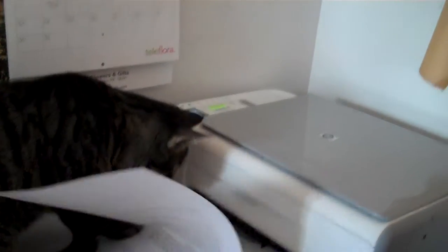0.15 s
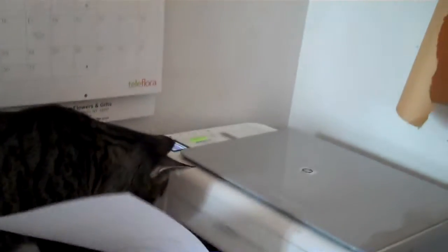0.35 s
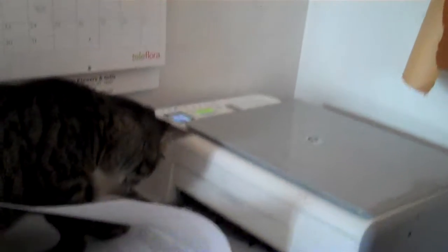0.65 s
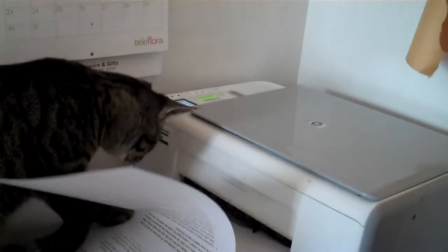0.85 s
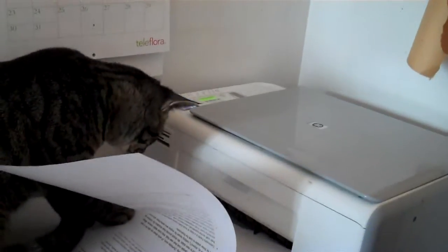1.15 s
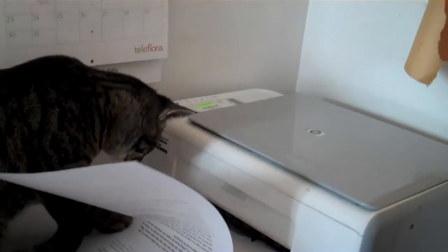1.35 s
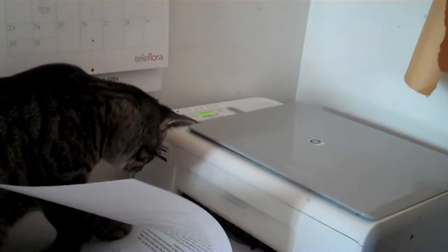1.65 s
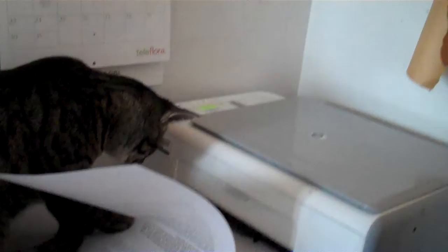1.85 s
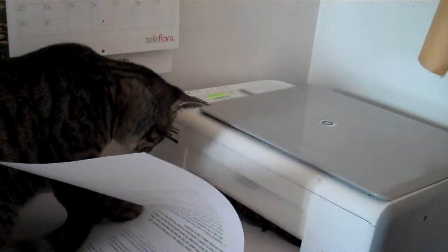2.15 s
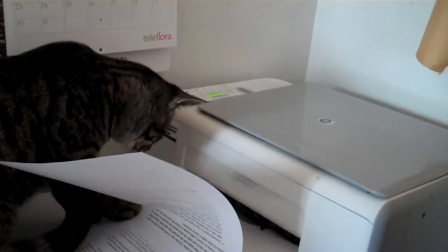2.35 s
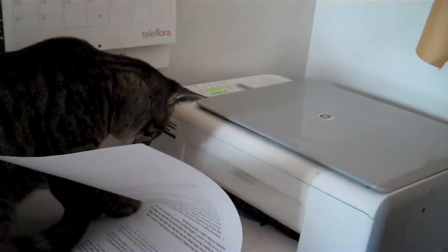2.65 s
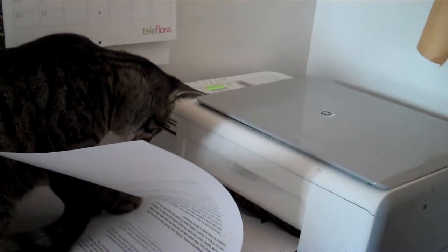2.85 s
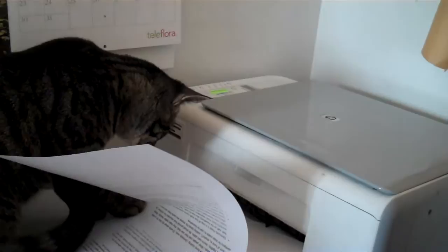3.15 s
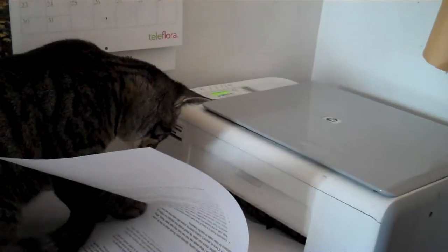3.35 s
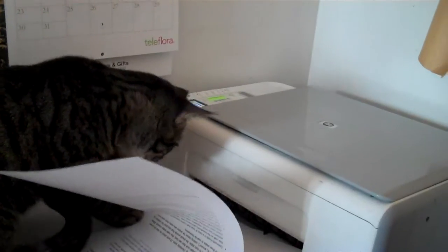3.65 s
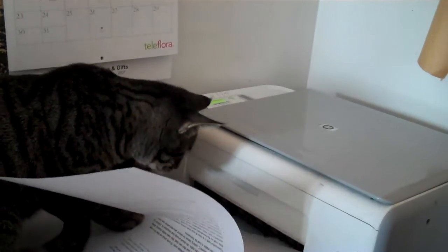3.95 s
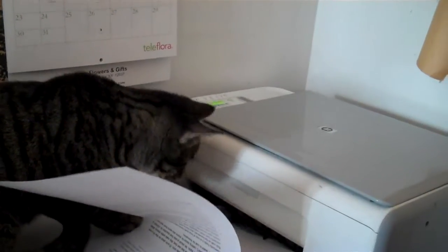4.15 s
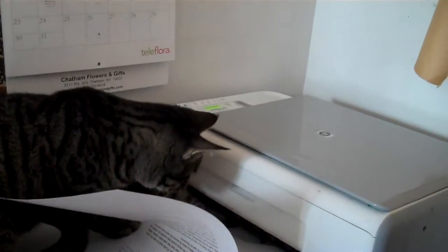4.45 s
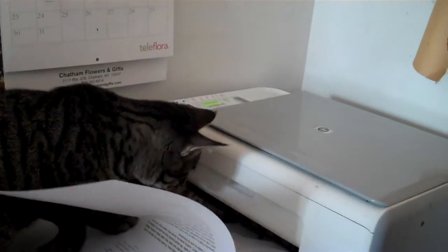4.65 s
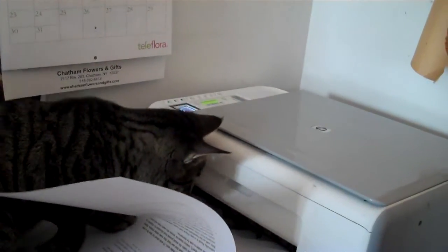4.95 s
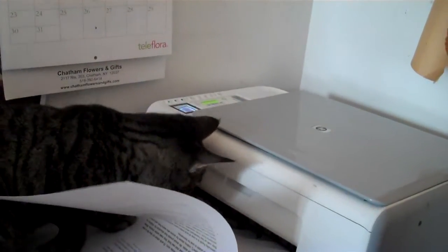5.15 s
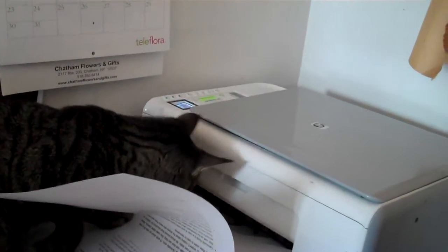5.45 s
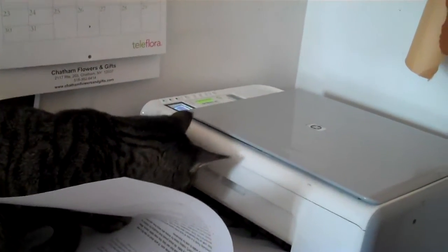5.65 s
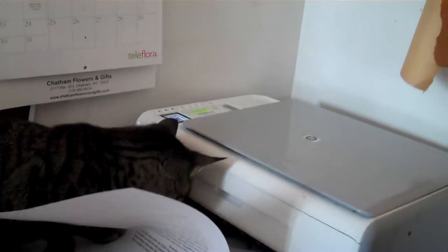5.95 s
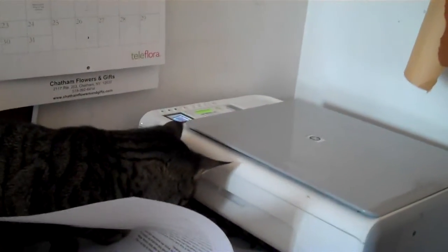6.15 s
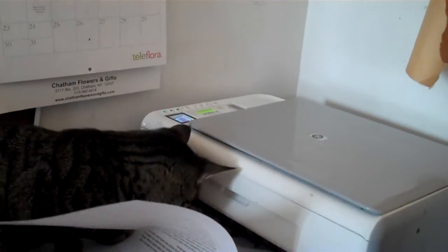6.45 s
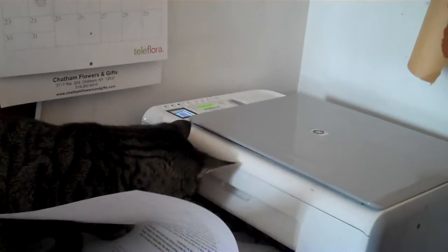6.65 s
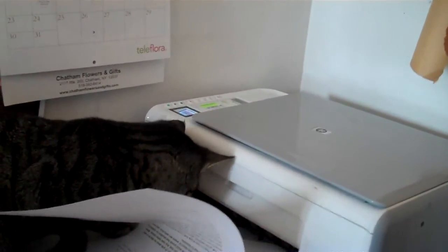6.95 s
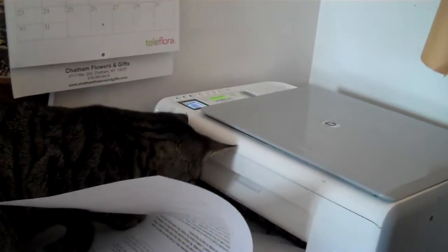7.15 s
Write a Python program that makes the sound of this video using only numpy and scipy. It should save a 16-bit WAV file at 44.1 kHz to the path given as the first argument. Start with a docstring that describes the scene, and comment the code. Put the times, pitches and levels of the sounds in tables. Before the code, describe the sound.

An inkjet printer clunks, rattles and whines as it feeds a sheet, then a cat paws paper with rustles and sharp taps.

```python
"""An inkjet printer parks its head, clunks through its gears and feeds a sheet, then stops.
Latches ring its plastic case, gear teeth rattle, two motors whine and jolts boom in the desk.
A cat noses and paws at the paper in the tray: sheets slide with a catching hiss, snap and tap.
A faint fan runs on. The room corner adds a short tail, and a small camera close by brightens
the treble with its two resonant microphone ports."""
import sys
import numpy as np
from scipy import signal
from scipy.fft import rfft, irfft
from scipy.io import wavfile

SR = 44100
rng = np.random.default_rng(int(sys.argv[2]) if len(sys.argv) > 2 else 0)


def to_wav(sig):
    """Store sig (one row per channel, or 1-D mono) as 16-bit WAV at the path in sys.argv[1].

    Samples outside -1..1 are clipped; the rate is SR.
    """
    pcm = np.clip(np.atleast_2d(sig), -1, 1) * 32767
    pcm = np.round(pcm).astype(np.int16)
    wavfile.write(sys.argv[1], SR, pcm.T)  # frames by channels


N = 321921
TIME, HZ = np.arange(N) / SR, np.fft.rfftfreq(N, 1 / SR)

# Hits of latches, gears and carriage stops, levels before trim:
# (time [s], length [s], thud [dB], clack [dB], tick [dB], ring of the struck part [Hz])
KNOCK_HITS = [(0.317, 0.0025, -60, -39.5, -36, 5530), (0.338, 0.014, -60, -32, -31, 370),
              (0.351, 0.013, -32.5, -41, -34.5, 342), (0.418, .011, -25.5, -27, -16.5, 238),
              (0.484, 0.0064, -46, -50, -30.5, 354), (0.885, 0.016, -41.5, -42.5, -63, 2880),
              (0.93, 0.03, -47, -46, -54, 524), (0.962, 0.028, -36.5, -41.5, -36.5, 3280),
              (0.977, 0.0086, -32, -26.5, -33, 3200), (1.024, 0.015, -36.5, -31, -28, 3800),
              (1.042, 0.02, -39.5, -34, -45, 1500), (1.192, 0.0029, -42, -35.5, -48, 4300),
              (1.251, 0.0079, -48, -43, -43, 2770), (1.266, 0.021, -41, -46, -41.5, 408),
              (1.311, 0.0093, -37.5, -39, -52, 2270), (1.66, 0.0042, -57, -47, -27, 2010),
              (1.741, 0.0072, -71, -45.5, -39, 3760), (2.013, 0.0064, -43.5, -41, -41, 590),
              (2.062, 0.007, -56, -39.5, -42, 3100), (2.081, 0.014, -48, -46.5, -42, 420),
              (2.148, 0.022, -43.5, -40.5, -40.5, 580), (2.249, .01, -48, -42, -26.5, 5140),
              (2.293, 0.0063, -51, -48, -34.5, 313), (2.325, 0.015, -47.5, -48, -47, 506),
              (2.374, 0.018, -48.5, -50, -40, 580), (2.403, 0.011, -47, -44.5, -41, 665),
              (2.424, .012, -44, -58, -42, 644), (2.482, 0.014, -29.5, -33, -27, 2180),
              (2.546, 0.0099, -30.5, -40.5, -37, 1190), (2.591, 0.015, -43, -38, -35, 2950),
              (2.609, 0.0061, -39, -34, -55, 3040), (2.632, 0.0088, -49, -49, -48, 560),
              (2.665, .012, -38, -46, -46.5, 1164)]
# Colour of struck plastic: (frequency [Hz], spectral level [dB])
PLASTIC_COLOUR = [(30, -37), (85, -8.5), (120, -24), (190, -3), (400, 4), (1100, 0.5), (1700, -2),
                  (3200, -4.5), (4600, -10), (5800, -18.5), (7400, -14.5), (9000, -18.5), (13000, -19.5)]
# Resonances of the case: (frequency [Hz], width [Hz], relative gain [dB])
CASE_MODES = [(164, 44, 4.5), (237, 20, -9), (321, 24, 0.5), (392, 46, 2.5), (500, 14, -12), (606, 73, 7),
              (678, 35, 4), (1080, 110, 3.5), (2160, 270, 2), (3080, 90, -11), (4380, 50, -9)]
# Gear runs that shift, park the head, engage the rollers and feed, levels before trim:
# (start [s], stop [s], rumble [dB], gear mesh [dB], sliding hiss [dB])
GEAR_RUNS = [(0.311, 0.519, -39.5, -47.5, -48), (0.526, 0.855, -54.5, -57, -56.5),
             (0.875, 1.115, -45.5, -62, -53), (1.265, 2.67, -48.5, -51, -52)]
# Colour of running gears: (frequency [Hz], spectral level [dB])
GEAR_COLOUR = [(30, -26), (85, -25), (120, -9), (200, 4), (450, 5.5), (900, -1), (1500, -8.5), (2700, -11),
               (3500, -15.5), (6000, -19.5), (8500, -19), (13000, -21)]
# Whine of the feed motor and of the carriage motor: (frequency [Hz], level before trim [dB])
FEED_TONES = [(318.5, -60), (390.6, -71), (441.3, -61), (512.6, -66), (556, -83), (586, -68.5),
              (883.5, -64.5), (945, -72), (1184, -72), (1313, -68), (1535, -70), (2081, -71), (2369, -69.5),
              (3020, -73)]
CARRIAGE_TONES = [(455, -66), (513, -73), (1332, -66.5), (1362, -61), (1485, -66), (2035, -67), (2170, -79)]
# Jolts that rock the printer on its desk: (time [s], level [dB])
DESK_JOLTS = [(0.427, -51), (0.489, -64), (0.976, -63), (1.028, -61), (1.287, -62)]
# Resonances of the desk: (frequency [Hz], level over the jolt [dB], decay T60 [s])
DESK_MODES = [(42.3, -15, .4), (81.5, 0.5, 0.53), (103, 4, 0.51), (128, -12, 0.24), (156, -6, 0.53)]

# Paw strokes that drag a sheet, levels before trim: (start [s], length [s], hiss [dB], scrape [dB])
PAW_STROKES = [(0.031, 0.12, -48, -48.5), (0.186, 0.28, -61.5, -55.5), (3.653, 0.053, -51, -51.5),
               (3.969, 0.067, -56.5, -55.5), (4.103, 0.03, -52.5, -54.5), (4.215, 0.038, -53.5, -65),
               (4.31, 0.089, -42, -51), (4.375, 0.11, -47.5, -50), (4.747, 0.081, -49, -54),
               (4.823, .325, -42.5, -49.5), (5.453, .11, -59, -59.5), (5.788, 0.053, -50.5, -55.5),
               (5.862, 0.04, -44, -56), (5.913, 0.21, -58.5, -60), (6.205, 0.16, -57.5, -59),
               (6.803, 0.23, -55, -59), (6.979, 0.21, -43.5, -52.5)]
# Colour of sliding paper: (frequency [Hz], spectral level [dB])
SLIDE_COLOUR = [(60, -9), (170, -6), (300, 0.5), (600, -0.5), (1100, -2.5), (1700, 5), (2400, 11),
                (4000, 7), (5600, 0), (8000, 1.5), (10500, -1.5), (14000, -1.5)]
# Paper snaps and paw taps, levels before trim:
# (time [s], length [s], thud [dB], clack [dB], tick [dB], ring of the sheet or tray [Hz])
PAPER_HITS = [(3.691, 0.0059, -68, -51, -40, 4000), (3.7085, 0.0041, -31, -22, -28.5, 6230),
              (3.732, 0.0091, -49, -56, -61, 2320), (3.897, 0.0032, -70, -62, -51, 4300),
              (3.992, 0.023, -51, -51, -58, 1550), (4.055, .013, -65, -54, -50, 3980),
              (4.139, 0.0085, -49, -46, -67, 4200), (4.165, .007, -50, -54, -70, 1100),
              (4.299, .0035, -53, -70, -42, 9300), (4.359, .013, -67, -47, -39, 5300),
              (4.387, 0.0041, -41, -43, -53, 1060), (4.469, .004, -41, -41.5, -56, 1120),
              (4.803, 0.0093, -72, -39.5, -33, 2950), (4.821, 0.0032, -64, -38.5, -51, 2900),
              (4.986, .011, -61, -50, -38, 3130), (5.121, .003, -48, -53, -32, 5140),
              (5.163, 0.0077, -43.5, -43.5, -43, 614), (5.507, 0.0037, -40.5, -47.5, -38, 1570),
              (5.528, 0.0065, -44.5, -61, -41, 610), (5.823, .004, -49, -53, -37.5, 2580),
              (6.406, 0.019, -70, -53.5, -55.5, 2460), (6.791, 0.0067, -53, -44.5, -44.5, 4400),
              (6.84, 0.02, -45.5, -40.5, -41, 5280), (6.877, 0.013, -55, -46, -41, 1910),
              (6.898, .005, -45, -46, -26.5, 1900), (7.059, 0.0046, -50, -50, -31.5, 5350)]
# Colour of a snapping sheet: (frequency [Hz], spectral level [dB])
SNAP_COLOUR = [(60, -39), (170, -21), (300, -2), (600, -2.5), (1100, -2), (1700, 2.5), (2400, 11.5),
               (4000, 10.5), (6200, 5), (8000, 7), (10500, -4), (14000, 2.5)]
# How freely a struck part rings: (pitch [Hz], level over the hit [dB])
RING_LEVELS = [(230, 2), (400, -2.5), (620, -4.5), (1100, -3), (2900, 0), (5000, -5), (6300, -0.5),
               (9600, 16)]
# Stereo image of printer and paper: (frequency [Hz], left-right likeness [0-1])
CLOSE_LIKENESS = [(30, 0.4), (150, 1), (1000, 1), (2200, 0.87), (4500, 0.25), (7500, 0.15), (14000, 0.11)]

# Colour of the fan's air bed: (frequency [Hz], spectral level [dB])
AIR_COLOUR = [(20, -0.5), (45, -13.5), (70, -7), (140, -7), (220, 0), (280, 4), (400, -3.5), (650, -3.5),
              (1000, -4.5), (1500, -10), (3000, -14.5), (6000, -25), (14000, -31)]
# Thin tones of the fan: (frequency [Hz], level [dB])
FAN_TONES = [(748.3, -71.5), (1394, -78), (1604, -80.5), (2885, -81), (3004, -82), (4344, -82), (7854, -96)]
# Stereo image of the air and the reverb: (frequency [Hz], left-right likeness [0-1])
ROOM_LIKENESS = [(30, 0.076), (250, 0.93), (1000, 0.67), (2200, 0.17), (14000, 0.097)]
# Length of the room's tail: (frequency [Hz], decay T60 [s])
ROOM_DECAY = [(100, 0.13), (400, 0.19), (1000, 0.21), (3000, 0.16), (8000, 0.13)]
# Left and right microphone ports: (resonance [Hz], sharpness [Q])
MIC_PORTS = [(7410, 5.87), (6640, 2.6)]

CROSSOVERS_HZ = (1400, 5500)  # between the low, mid and high bands


def printer():
    """Gears rattle, knocks ring the case and two motors whine, just left of centre."""
    knocks = hits(KNOCK_HITS, PLASTIC_COLOUR, attack_s=.0013, trims_db=(-5, -3, -8.2), left_db=2.5,
                  thud_stretch=1.91, tick_stretch=.97, chatter_db=.3, ring_q=10)
    feed = amp(-1) * whine(FEED_TONES, motor_effort(1.27, 2.67), waver=.0042, flutter_db=4)
    carriage = amp(-2) * whine(CARRIAGE_TONES, motor_effort(.39, .76), waver=.017, flutter_db=2)
    return (gear_train() + case_ring(knocks, trim_db=-3) + feed + carriage) * pan(left_db=.8)


def hits(rows, colour, attack_s, trims_db, left_db, thud_stretch, tick_stretch, chatter_db, ring_q):
    """Each hit is a burst of chattering contacts that rings the struck part and rebounds with a thud."""
    rebound_s, rebound_db = .0197, -15
    out, t = np.zeros((2, N)), np.arange(SR // 5) / SR
    contacts = three_bands(noise_pair(colour, CLOSE_LIKENESS)) * amp(chatter_db * wander(900))
    side = pan(left_db)
    for time_s, length, *bands_db, ring_hz in rows:
        span = slice(round(time_s * SR), round(time_s * SR) + len(t))
        attack = attack_s + .091 * length  # longer hits land softer
        shapes = hit_envelope(t, attack, length * np.array([thud_stretch, 1, tick_stretch])[:, None, None])
        rebound = amp(rebound_db) * hit_envelope(t - rebound_s, attack, length * thud_stretch)
        shapes[0] = np.hypot(shapes[0], rebound)
        gains = np.sqrt(np.mean(shapes ** 2, (1, 2))) * amp(np.add(bands_db, trims_db))
        bursts = contacts[:, :, span] * shapes
        thud, clack, tick = (gain * unit(burst) for gain, burst in zip(gains, bursts))
        scuff = rng.standard_normal(len(t)) * shapes[1, 0]
        push = gains[np.searchsorted(CROSSOVERS_HZ, ring_hz)]  # force of the hit at the ring's pitch
        ring = unit(resonate(resonate(scuff, ring_hz, q=2), ring_hz, ring_q))
        ring *= push * amp(curve(RING_LEVELS, ring_hz))
        out[:, span] += thud + np.sqrt(side) * (clack + ring) + side * tick  # the thud stays centred
    return out


def hit_envelope(t, attack, length, hold_share=.18):
    """A straight attack, a short hold and an exponential decay."""
    decaying_s = np.maximum(t - attack - hold_share * length, 0)
    return np.clip(t / attack, 0, 1) * np.exp(-decaying_s / ((1 - hold_share) * length))


def case_ring(knocks, trim_db):
    """The plastic case adds its boxy resonances to the dry knocks."""
    return knocks + sum(amp(db + trim_db) * resonate(knocks, hz, hz / width)
                        for hz, width, db in CASE_MODES)


def gear_train(surge_db=2.5, surge_s=.035, trims_db=(-4.5, -4.5, -9)):
    """Teeth rattle through each run, surging as they take up the load."""
    teeth = unit(1 + .6 * grains(per_s=180, spread_db=2.5, length_s=.0025))
    drive = np.zeros((3, N))
    for start, stop, *bands_db in GEAR_RUNS:
        surge = amp(surge_db * np.exp(-abs(TIME - start) / surge_s))
        drive += amp(np.add(bands_db, trims_db))[:, None] * motor_effort(start, stop) * surge
    bands = three_bands(noise_pair(GEAR_COLOUR, CLOSE_LIKENESS))
    return teeth * (drive[:, None] * bands).sum(0)


def motor_effort(start_s, stop_s, spin_up_s=.022, coast_s=.031):
    """A motor spins up, holds and coasts to rest."""
    return np.clip((TIME - start_s) / spin_up_s, 0, 1) * np.exp(-np.maximum(TIME - stop_s, 0) / coast_s)


def whine(tones, effort, waver, flutter_db):
    """Motor tones follow the shaft speed, which sags at low effort; each flutters with the load."""
    speed = 1 - .1 * np.maximum(1 - effort / .4, 0)
    shaft_time = np.cumsum(speed * (1 + waver * wander(25.01))) / SR
    chord = sum(amp(db + flutter_db * wander(22)) * np.sin(2 * np.pi * (hz * shaft_time + rng.random()))
                for hz, db in tones)
    return np.sqrt(2) * chord * effort


def desk():
    """The desk booms briefly under each jolt of the printer."""
    out = np.zeros(N)
    for time_s, jolt_db in DESK_JOLTS:
        t = np.maximum(TIME - time_s, 0)
        for hz, db, t60 in DESK_MODES:
            out += amp(jolt_db + db) * np.exp(-np.log(1000) * t / t60) * np.sin(2 * np.pi * hz * t)
    return out


def paper():
    """Fibres catch and slip as the sheets slide; buckling sheets snap against the tray."""
    hiss, scrape = sum(amp(levels_db)[:, None] * paw_stroke(start, length)
                       for start, length, *levels_db in PAW_STROKES)
    low, mid, high = three_bands(noise_pair(SLIDE_COLOUR, CLOSE_LIKENESS))
    slips = unit(1 + .7 * grains(per_s=600, spread_db=2.5, length_s=.001))
    slide = slips * (scrape * (amp(-9) * low + amp(-5.5) * mid) + hiss * amp(-4) * high)
    snaps = hits(PAPER_HITS, SNAP_COLOUR, attack_s=.0009, trims_db=(-4.4, -2.8, -7.4), left_db=3.8,
                 thud_stretch=2.3, tick_stretch=.66, chatter_db=2, ring_q=15)
    return (slide + snaps) * pan(left_db=1.2)


def paw_stroke(start, length, swell_share=.69, start_db=-15.5, fade_s=.025):
    """A dragged sheet gathers speed, holds and settles when the paw lets go."""
    swell = np.clip((TIME - start) / (swell_share * length), 0, 1)
    outside_s = np.maximum(start - TIME, 0) + np.maximum(TIME - start - length, 0)
    return amp(start_db * (1 - swell) ** 2) * np.exp(-outside_s / fade_s)


def fan():
    """A steady bed of moving air with a few faint tones."""
    air = unit(irfft(noise_pair(AIR_COLOUR, ROOM_LIKENESS), N)) * amp(-57.5 + .13 * wander(7))
    return air + whine(FAN_TONES, effort=1, waver=.0028, flutter_db=2.5)


def room(sound, wet_db):
    """Sparse reflections off the nearby walls add a short tail in which the mids hang longest."""
    count, predelay, spacing = 1000, 150, 22  # predelay and spacing in samples
    arrivals = predelay + spacing * np.arange(count) + rng.integers(0, spacing, (2, count))
    echoes = np.zeros((2, SR * 3 // 5))
    np.put_along_axis(echoes, arrivals, rng.choice([-1., 1.], arrivals.shape), 1)
    hz, t, spectra = signal.stft(echoes, SR, nperseg=256)
    likeness = curve(ROOM_LIKENESS, hz)[:, None]
    spectra[1] = likeness * spectra[0] + np.sqrt(1 - likeness ** 2) * spectra[1]
    decay = np.exp(-np.log(1000) * t / curve(ROOM_DECAY, hz)[:, None])
    tail = signal.istft(spectra * decay, SR)[1]
    tail /= np.linalg.norm(tail[0])
    return sound + amp(wet_db) * signal.fftconvolve(sound, tail, axes=1)[:, :N]


def grains(per_s, spread_db, length_s):
    """Gritty envelope of many tiny impacts, a few of them large; its energy has rms 1."""
    impacts = (rng.random(N) < per_s / SR) * amp(spread_db * np.minimum(rng.exponential(1, N), 3))
    energy = signal.lfilter([1], [1, -np.exp(-2 / (length_s * SR))], impacts ** 2)
    return np.sqrt(unit(energy) + 1e-12)


def noise_pair(colour, stereo_image):
    """Left and right spectra of coloured, partly alike noise."""
    left, other = rng.standard_normal((2, len(HZ))) + 1j * rng.standard_normal((2, len(HZ)))
    likeness = curve(stereo_image, HZ)
    right = likeness * left + np.sqrt(1 - likeness ** 2) * other
    return np.array([left, right]) * amp(curve(colour, HZ))


def three_bands(spectrum):
    """Low, mid and high bands of a spectrum as waves of rms 1."""
    low, not_high = (1 / (1 + (HZ / edge) ** 10) for edge in CROSSOVERS_HZ)
    shares = low, not_high - low, 1 - not_high
    return np.array([unit(irfft(spectrum * np.sqrt(abs(share)), N)) for share in shares])


def wander(per_s):
    """A random drift of rms 1 with per_s turning points a second."""
    return unit(np.interp(TIME * per_s, np.arange(N), rng.standard_normal(N)))


def curve(points, hz):
    """Joins points by straight lines on a log-frequency axis."""
    point_hz, values = np.transpose(points)
    return np.interp(np.log(hz + 1), np.log(point_hz + 1), values)


def resonate(x, hz, q):
    return signal.lfilter(*signal.iirpeak(hz, q, fs=SR), x)


def pan(left_db):
    return amp([[left_db / 2], [-left_db / 2]])


def amp(db):
    return 10 ** (np.asarray(db) / 20)


def unit(x):
    return x / np.sqrt(np.mean(x ** 2) + 1e-20)


def scene():
    """Printer and paper in the room, over the desk's boom and the fan."""
    return room(printer(), wet_db=-10.5) + desk() + room(paper(), wet_db=-9.5) + fan()


def record(dry):
    """Each port rings in the treble and rolls off above; amplifier hiss and a steep high cut follow."""
    left_delay_s, hiss_db, high_cut_hz = 4.2e-5, -61, 14350
    ports = np.array([1 / (1 - (HZ / hz) ** 2 + 1j * HZ / (hz * q)) for hz, q in MIC_PORTS])
    ports[0] *= np.exp(-2j * np.pi * HZ * left_delay_s)
    heard = irfft(rfft(dry) * ports, N) + amp(hiss_db) * rng.standard_normal((2, N))
    high_cut = signal.firwin(511, high_cut_hz, window=("kaiser", 8), fs=SR)
    return signal.oaconvolve(heard, high_cut[None], "same")


dry = scene()
out = record(dry)
to_wav(out)
```